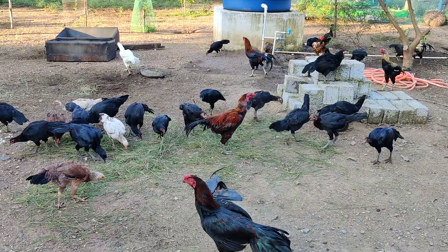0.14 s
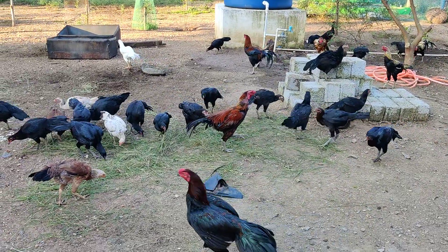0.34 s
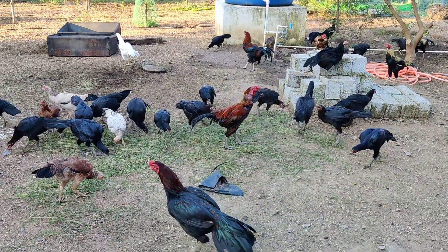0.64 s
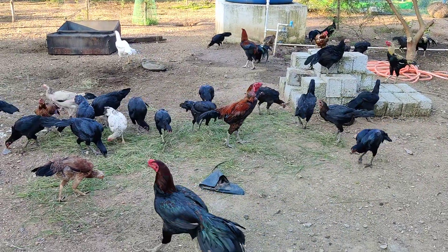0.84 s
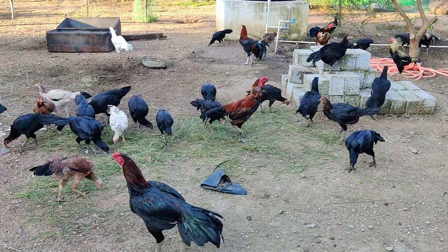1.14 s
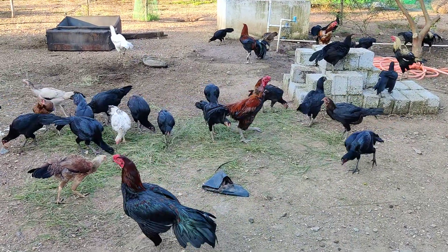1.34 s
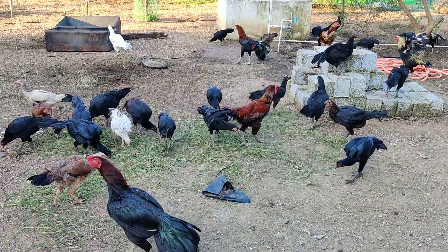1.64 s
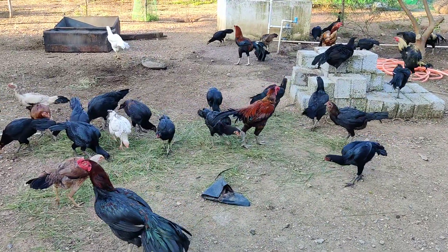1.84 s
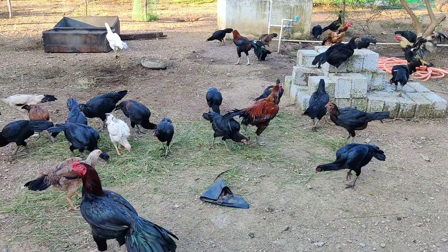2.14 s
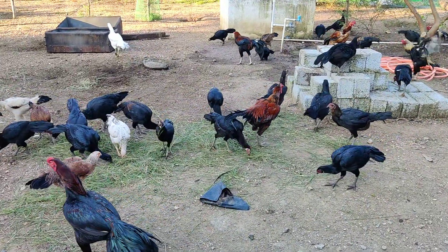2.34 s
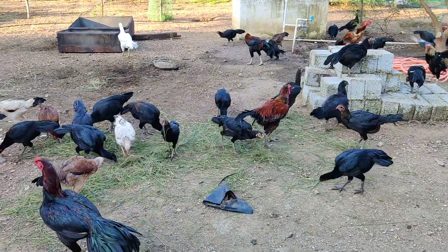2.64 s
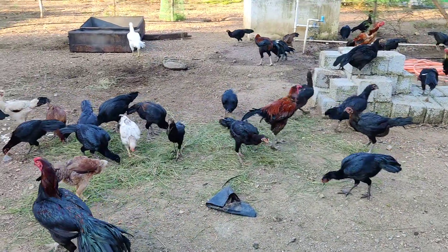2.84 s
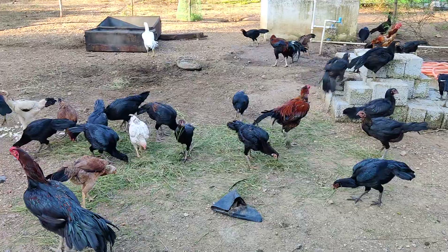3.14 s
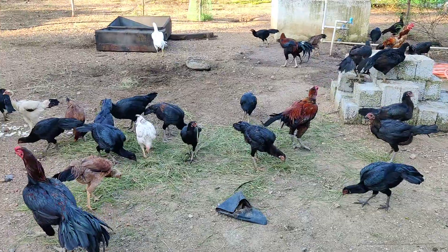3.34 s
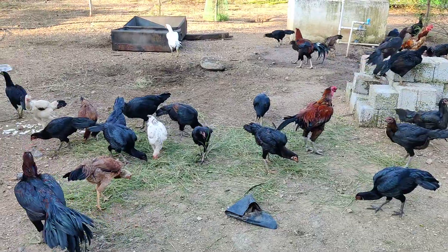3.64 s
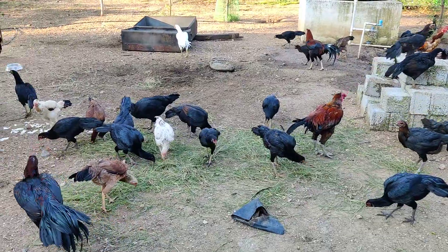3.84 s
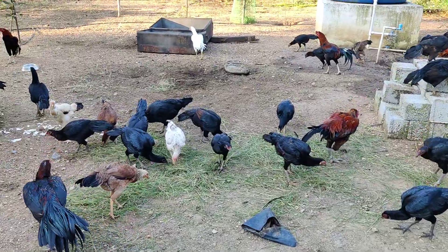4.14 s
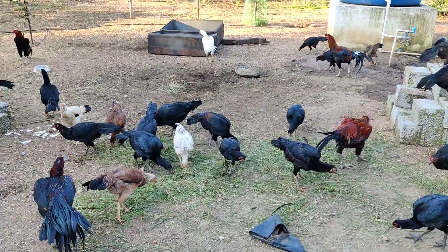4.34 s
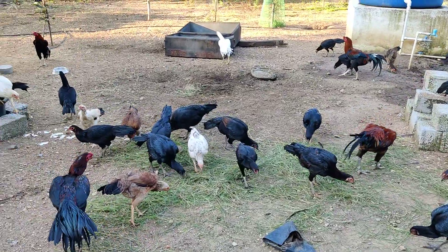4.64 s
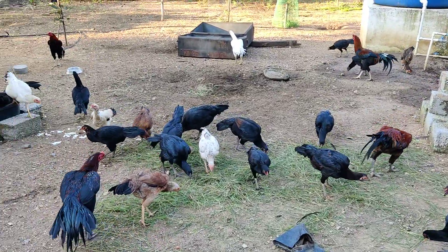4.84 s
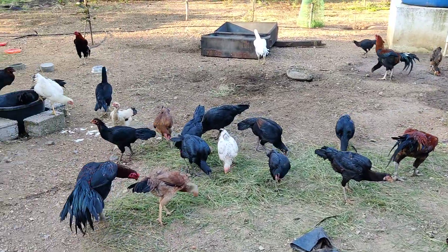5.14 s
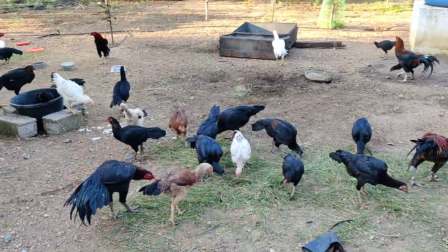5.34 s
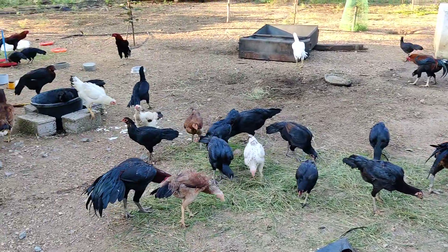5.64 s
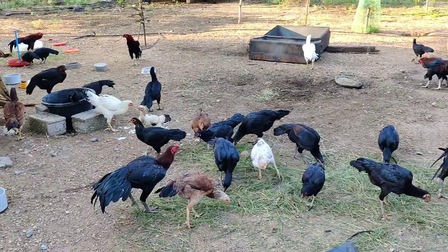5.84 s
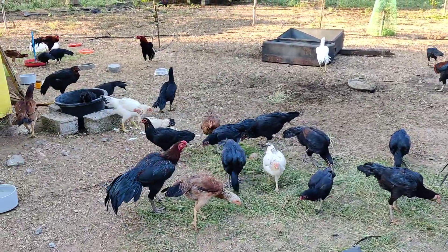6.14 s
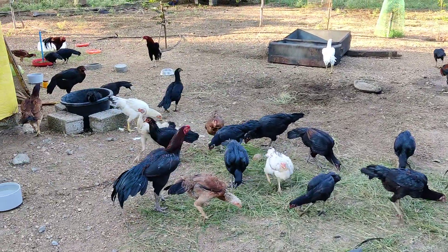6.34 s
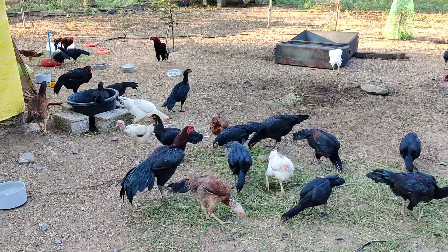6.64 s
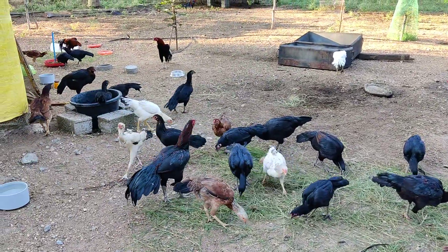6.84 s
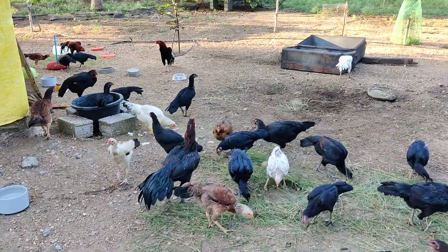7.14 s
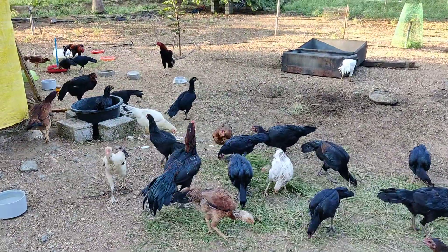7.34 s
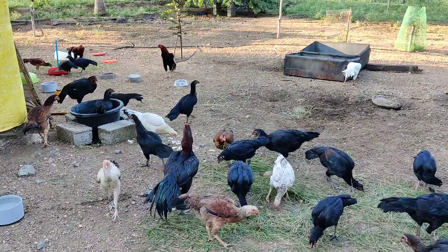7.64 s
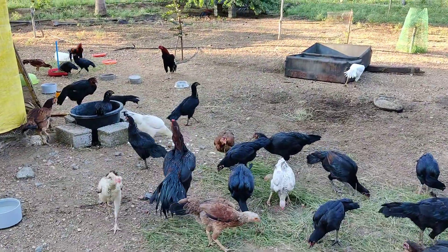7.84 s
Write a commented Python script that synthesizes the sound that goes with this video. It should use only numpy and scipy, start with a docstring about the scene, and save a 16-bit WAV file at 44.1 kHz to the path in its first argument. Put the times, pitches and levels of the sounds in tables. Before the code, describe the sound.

From 0 s a short hoarse, rattling trill sounds slightly left, then hens give soft, low, brief clucks with rising whines and thin chick peeps. Dry beak taps begin around 1.2 s, one quite sharp, with small coos and falling pips. At 2.4 s comes a tiny toneless squawk, followed by wavering whines and denser pecks and gritty clicks until about 4.6 s; clucks near 3.7-4.3 s are lower and fuller. From 4.7 to 6.3 s a rooster on the right crows once, far louder: two short syllables, a longer bright one, then a rasping, shuddering last one that drops abruptly. A light yard echo follows. Until 8 s quiet clucks, pips, high peeps, a few taps and a faint drawn-out whine return. Throughout, soft open-air noise, distant murmuring birds and a faint low engine hum that wavers and strengthens later.

```python
"""Chickens in a farm yard

A flock forages in the open: soft clucks, coos, whines, chick peeps and beaks tapping the ground.
A rooster off to the right crows once in four syllables; his pulsing voice turns from clean to raspy.
Hen notes are harmonics shaped by a throat; trills and whistles are sines; rasps, taps and air use noise.
Walls throw a light echo back, and a far engine hums in multiples of its firing rate."""
import sys
import numpy as np
from scipy import signal
from scipy.fft import rfft, irfft, next_fast_len
from scipy.io import wavfile
from scipy.ndimage import uniform_filter1d, map_coordinates

SR = 44100
rng = np.random.default_rng(int(sys.argv[2]) if len(sys.argv) > 2 else 0)


def generate_wav(sig):
    """Save sig (samples, or channels by samples) to the path in sys.argv[1] as 16-bit PCM at SR."""
    pcm = np.round(np.clip(np.atleast_2d(sig).T, -1, 1) * 32767).astype(np.int16)
    wavfile.write(sys.argv[1], SR, pcm)


N = 353241  # length in samples
TIME = np.arange(N) / SR
FREQS = np.fft.rfftfreq(N, 1 / SR)

# clucks of near and far hens: pitch rise and arch, and throat glide, as shares; roughness 0-1
CLUCK_RISE, CLUCK_ARCH, CLUCK_GAPE, CLUCK_ROUGH = .06, .12, .25, .4
# a full shudder of the rooster: level swing (applied in parts in throat) and pitch bend as a share
SHUDDER_DB, SHUDDER_BEND = 6, 0.05
# tone colour of a hen's harsh hiss: freq_hz, relative_db
HISS_COLOUR = [(120, -31), (200, -16), (480, -14.5), (800, -0.5), (1120, -11), (2400, -8.5), (3050, -24),
               (6040, -30.5), (11700, -86)]


def amp(db):
    """Decibels to gain."""
    return 10 ** (np.asarray(db) / 20)


def unit(x):
    """Scales to rms 1."""
    return x / np.sqrt(np.mean(x ** 2) + 1e-20)


def read(points, hz):
    """Reads a table on a log-frequency axis."""
    f, value = np.transpose(points)
    return np.interp(np.log(hz + 1), np.log(f + 1), value)


def curves(rows):
    """Sample times over a table's span, and its columns at those times."""
    s, *columns = np.transpose(rows)
    t = np.arange(s[0], s[-1], 1 / SR)
    return [t] + [np.interp(t, s, c) for c in columns]


def add(mix, s, sound):
    """Adds a sound into the mix at a time in seconds."""
    start = max(round(s * SR), 0)
    part = mix[..., start:][..., :sound.shape[-1]]
    part += sound[..., :part.shape[-1]]


def colour(x, points, size=2048):
    """Filters with the given spectrum, without any ringing before a sound begins."""
    log_gain = np.log(amp(read(points, abs(np.fft.fftfreq(size, 1 / SR)))))
    # this phase puts the filter's response after time zero
    taps = np.fft.ifft(np.exp(np.conj(signal.hilbert(log_gain)))).real
    return signal.oaconvolve(x, taps[:size // 2])[:len(x)]


def wander(count, hz):
    """Smooth random drift of rms about 1, mostly slower than the given rate."""
    size = next_fast_len(count + 4096)
    f = np.fft.rfftfreq(size, 1 / SR)
    spectrum = rfft(rng.standard_normal(size)) / (1 + (f / hz) ** 4)
    return unit(irfft(spectrum, size))[:count]


def ramp(x):
    """Eases from 0 to 1 as x goes from 0 to 1."""
    return np.sin(np.pi / 2 * np.clip(x, 0, 1)) ** 2


def ports(x, balance, phase=0):
    """Sets the level and phase difference between the two microphones, by frequency."""
    half = amp(read(balance, FREQS) / 2) * np.exp(.5j * phase)
    pair = np.array([half, 1 / half])
    level = np.sqrt(np.mean(abs(pair) ** 2, 0))  # keeps the mean power of the pair
    return irfft(rfft(x) * pair / level, N)


def place(x, side, across_s=0.00033, shade_db=1):
    """A sound from one side (-1 left, 1 right) reaches the far microphone later and a little weaker."""
    lag = int(round(min(abs(side), 1) * across_s * SR))
    near = np.pad(x, (0, lag))
    far = np.pad(x, (lag, 0)) * amp(-shade_db * abs(side))
    return np.array([far, near] if side > 0 else [near, far])


def air(air_db=-50, rustle_db=2.0):
    """The noise of the open yard, swelling slightly as feet shuffle in the straw."""
    # spectrum of the air: freq_hz, relative_db (per Hz)
    spectrum = [(25, 0.5), (100, -4), (200, -8.5), (480, -20.5), (850, -16), (1300, -24), (2400, -17.5),
                (3300, -28), (6400, -31.5), (8000, -39.5), (9500, -54), (13000, -51)]
    # how alike the two channels are: freq_hz, likeness (-1 to 1)
    likeness = [(60, 0.76), (180, 0.99), (520, 0.63), (1520, -0.27), (4470, 0.13), (13100, -0.21)]
    a, b = rfft(rng.standard_normal((2, N)))
    same = np.clip(read(likeness, FREQS), -.99, .99)
    right = same * a + np.sqrt(1 - same ** 2) * b
    pair = irfft(np.array([a, right]) * amp(read(spectrum, FREQS)), N)
    return amp(air_db + rustle_db * wander(N, 18)) * unit(pair)


def engine(waver=0.011, flutter=0.092, clatter_db=-22, clatter_share=0.13):
    """A far engine: its lowest orders carry, with a faint rattle at each firing."""
    # speed and loudness: time_s, firings_per_s, level_db
    running = [(0.1, 45.4, -50), (1.5, 43.7, -57.5), (2.25, 43.6, -55), (2.62, 42.5, -43.5),
               (3.31, 42, -49.5), (3.94, 43.2, -45.5), (4.811, 43, -50.5), (5.07, 41.2, -44),
               (7.2, 40.9, -42.5), (7.5, 43.5, -49.5)]
    # multiples 1, 2, 3, 4 of the firing rate: relative_db
    orders = [-1.5, -2, -13.5, -15.5]
    # tone colour of the rattle: freq_hz, relative_db
    clatter = [(600, -27), (1400, 4), (2050, 9), (3000, -6.5), (8000, -28)]
    s, hz, db = np.transpose(running)
    turns = np.cumsum(np.interp(TIME, s, hz) * (1 + waver * wander(N, 6))) / SR
    hum = 0
    for k, level in enumerate(orders, 1):
        hum = hum + amp(level) * np.cos(2 * np.pi * k * turns) * (1 + flutter * wander(N, 3.4))
    bursts = np.exp(-(turns % 1) / clatter_share)  # dies away after each firing
    rattle = colour(rng.standard_normal(N) * bursts, clatter)
    return amp(np.interp(TIME, s, db)) * (unit(hum) + amp(clatter_db) * unit(rattle))


def trill(rolls_hz=52, first_roll_s=.07, swing=0.23, rasp=0.31):
    """A rattling call: each roll is a short, hoarse, falling pip."""
    # the whole call: time_s, level_db, middle_pitch_hz
    call = [(0, -43.5, 1380), (.06, -42, 1308), (.068, -31, 910), (.089, -32, 884), (.105, -37.5, 849),
            (.15, -39.5, 855), (.19, -51, 850)]
    t, db, hz = curves(call)
    roll = ((t - first_roll_s) * rolls_hz + .5) % 1  # 0 to 1 within each roll
    pitch = hz * (1 + swing * (1 - 2 * roll) + 0.114 * wander(len(t), 280))
    turns = np.cumsum(pitch) / SR
    hiss = unit(colour(rng.standard_normal(len(t)), HISS_COLOUR))
    voice = unit(np.sin(2 * np.pi * turns)) * np.sin(np.pi * roll) ** 2 + rasp * hiss
    out = np.zeros((2, N))
    add(out, t[0], place(amp(db) * voice, -0.29))
    return out


def hen_note(length, first_hz, last_hz, throat_hz, db, rough, arch=0.026, gape=0, bright_db=0,
             width_hz=330, jitter=0.1806, rasp=0.9):
    """One arched glide of a hen's syrinx through her throat resonance, which rises and falls as the beak gapes."""
    # gain besides the main resonance: freq_hz, gain_db (before bright_db is added)
    hen_throat = [(220, -1), (400, -10), (1000, -26), (1700, -43), (2450, -19.5), (2900, -29.5),
                  (3400, -26.5), (3850, -31.5), (4350, -28), (5200, -50), (8000, -49.5)]
    u = np.linspace(0, 1, max(int(length * SR), 200))
    bow = np.sin(np.pi * u) - 2 / np.pi  # an arch that averages zero
    hz = (first_hz + (last_hz - first_hz) * u) * (1 + arch * bow)
    turns = np.cumsum(hz * (1 + jitter * rough * wander(len(u), 223))) / SR
    k = np.arange(1, int(8000 / first_hz) + 1)[:, None]  # harmonic numbers
    detune = 2 * (k * hz - throat_hz * (1 + gape * bow)) / width_hz
    gains = 1 / (1 + detune ** 2) + amp(read(hen_throat, k * hz) + bright_db)
    # each pulse rings out causally, so higher harmonics lag behind
    harmonics = gains * np.cos(2 * np.pi * k * turns - np.arctan(detune))
    tone = unit(harmonics.sum(0))
    swell = np.sin(np.pi * u ** 0.8).clip(0) ** 0.52
    return amp(db) * swell * tone * (1 + rasp * rough * wander(len(u), 120))


def far_flock(count=150, murmur_db=-55.5, spread_db=11, hush_db=7):
    """Birds further off cluck briefly at random, mostly low, and grow quieter as time goes on."""
    out = np.zeros((2, N))
    for k, (slip, length, pitch, glide, throat_draw, loud, side) in enumerate(rng.random((count, 7))):
        when = ((k + slip) / count) ** 1.35  # share of the scene; clucks thin out only slowly
        hz = 200 * 5 ** (pitch ** 2)
        last_hz = hz * (1.1 - .3 * glide)
        db = murmur_db + spread_db * (loud - .5) + hush_db * (.5 - when)
        note = hen_note(.02 + .045 * length, hz, last_hz, 560 + 460 * throat_draw, db, CLUCK_ROUGH,
                        arch=CLUCK_ARCH, gape=CLUCK_GAPE)
        add(out, when * N / SR, place(note, 2 * side - 1))
    return out


def peep(length, hz, db, fall=0.14):
    """A thin, quavering whistle that loses a share (fall) of its pitch."""
    u = np.linspace(0, 1, int(length * SR))
    quaver = .035 * wander(len(u), 300)
    turns = np.cumsum(hz * (1 - fall * u ** 2 + quaver)) / SR
    return amp(db) * np.sin(np.pi * u) * np.sin(2 * np.pi * turns)


def chicks(count=80, peep_db=-62, spread_db=7, low_hz=2500, high_hz=4800):
    """A few near peeps among many faint ones, each a falling whistle."""
    # the nearer peeps: start_s, length_s, first_pitch_hz, level_db
    near_peeps = [(.325, 0.03, 2420, -55), (.53, 0.027, 2480, -57), (.728, .04, 2530, -53),
                  (.91, 0.023, 2650, -59), (1.375, 0.053, 2780, -50), (2.33, 0.031, 2520, -52),
                  (6.7, .05, 3730, -59.5), (6.905, 0.056, 3240, -57), (7.45, 0.047, 3550, -49),
                  (7.56, .04, 3250, -52)]
    out = np.zeros((2, N))
    faint = []
    for when, length, pitch, loud in rng.random((count, 4)):
        hz = low_hz + (high_hz - low_hz) * pitch ** 2
        db = peep_db + spread_db * (loud - pitch)  # higher peeps are fainter
        faint.append((when * N / SR, 0.029 + 0.042 * length, hz, db))
    for s, length, hz, db in list(near_peeps) + faint:
        add(out, s, place(peep(length, hz, db), rng.uniform(-1, 1)))
    return out


def pecks(count=90, small_db=-56, spread_db=9, ring=0.7, ring_hz=2458, knock_t60_s=.026, grit_t60_s=.01):
    """Beaks strike the ground: a dry, briefly ringing knock and a click of grit; many are small."""
    # the louder pecks: start_s, peak_db, grit_share (0-1)
    loud_pecks = [(1.1626, -27.5, 0.06), (1.2375, -38, .1), (1.5837, -43, 0.07), (1.6031, -39.5, .1),
                  (2.112, -42, .1), (2.2407, -41, .1), (2.604, -32.5, 0.4), (2.6522, -29, 0.07),
                  (2.7503, -34, 0.36), (3.262, -35, 0.75), (3.2871, -37.5, 0.2), (3.3389, -42, 0.23),
                  (3.3948, -33, 0), (3.7335, -34.5, 0.7), (3.9401, -40, 0), (4.181, -39, 0.15),
                  (4.2154, -37, 0.2), (4.596, -36, 1), (6.8673, -41.5, 0.63), (7.3143, -36, 0.15),
                  (7.3502, -40, 0.25)]
    # tone colour of the knock: freq_hz, relative_db
    knock_colour = [(300, 19), (1100, 16.5), (1700, 11), (2500, 22.5), (3600, 3), (6500, -5.5), (8000, -30),
                    (12000, -23.5)]
    # tone colour of the grit: freq_hz, relative_db
    grit_colour = [(1000, -13), (3000, -2), (5500, 9), (7500, -3), (9000, -21), (12000, -33)]
    t = np.arange(2000) / SR
    out = np.zeros((2, N))
    small = [(when * N / SR, small_db + spread_db * loud ** 2, .5 * grit)
             for when, loud, grit in rng.random((count, 3))]
    for s, db, grit in list(loud_pecks) + small:
        hz = ring_hz * (1 + 0.11 * rng.uniform(-1, 1))
        thud = unit(colour(rng.standard_normal(len(t)), knock_colour))
        knock = (thud + ring * np.sin(2 * np.pi * hz * t)) * amp(-60 * t / knock_t60_s)
        click = unit(colour(rng.standard_normal(len(t)), grit_colour)) * amp(-60 * t / grit_t60_s)
        tick = (1 - grit) * knock + grit * click
        add(out, s, place(amp(db) * tick / abs(tick).max(), rng.uniform(-0.3, 0.18)))
    return out


def yard(x, first_s=0.0035, early_db=7, early_s=0.031):
    """Sparse echoes: strong ones from near walls, then a thin tail that dies band by band."""
    # time for the echoes to fall by 60 dB: freq_hz, t60_s
    decay = [(200, 0.084), (700, 0.52), (2400, 0.57), (5000, 0.57), (10000, 0.18)]
    taps = rng.standard_normal((2, SR)) * (rng.random((2, SR)) < 2500 / SR)  # about 2500 a second
    t = np.arange(SR) / SR
    taps = taps * (t > first_s) * (1 + amp(early_db) * np.exp(-t / early_s))
    hz, t, bands = signal.stft(taps, SR, nperseg=256)
    fading = bands * amp(-60 * t / read(decay, hz)[:, None])
    tail = signal.istft(fading, SR, nperseg=256)[1]
    tail = tail / np.linalg.norm(tail, axis=1, keepdims=True)
    return signal.fftconvolve(np.atleast_2d(x), tail, axes=1)[:, :N]


def hens(clucks_db=5.5, coos_db=8.0, pips_db=8.5, whines_db=3.5):
    """The near birds sing through the throat; in all but the clucks it is tuned to the pitch."""
    # the level_db of each kind is raised by that kind's setting above
    # a few low beats through an open beak: start_s, length_s, pitch_hz, throat_hz, level_db
    cluck_notes = [(0.216, 0.023, 311, 750, -56), (0.278, 0.028, 309, 830, -53.5),
                   (0.421, 0.05, 295, 740, -49), (0.749, 0.041, 324, 770, -48),
                   (0.894, 0.032, 311, 700, -61.5), (0.952, 0.03, 337, 760, -48.5),
                   (1.046, 0.031, 338, 780, -59), (1.115, 0.039, 385.5, 795, -48.5),
                   (1.25, 0.02, 449, 860, -46.5), (1.441, 0.046, 304, 900, -49.5),
                   (1.678, 0.013, 464, 920, -45.5), (1.802, 0.11, 305, 990, -52.5),
                   (1.908, 0.038, 287, 870, -57.5), (2.058, 0.087, 328, 970, -58.5),
                   (2.265, 0.044, 309.6, 900, -49.5), (2.71, 0.016, 349, 700, -49),
                   (2.885, 0.039, 337, 730, -53), (3.04, 0.018, 422, 856, -53.5),
                   (3.122, .016, 395, 790, -51), (3.152, 0.019, 315, 920, -51.5),
                   (3.244, 0.013, 416, 880, -49), (3.561, 0.12, 294, 960, -55.5),
                   (3.678, 0.026, 221, 860, -45), (3.831, 0.036, 279.5, 760, -41.5),
                   (3.889, 0.049, 267.4, 850, -51), (3.968, 0.05, 252.6, 790, -45),
                   (4.124, 0.048, 233.2, 754, -47.5), (4.294, 0.041, 211.5, 820, -42.5),
                   (6.485, 0.016, 388, 955, -49), (6.681, 0.011, 422, 740, -42.5),
                   (7.085, 0.013, 386, 780, -41), (7.13, 0.026, 342, 790, -51.5)]
    # low and nearly pure through a closed beak: start_s, pitch_hz, level_db
    coo_notes = [(1.259, 462, -49.5), (1.475, 428, -50), (1.485, 242, -49.5), (1.629, 422, -50),
                 (1.792, 434, -53), (3.005, 252, -53), (4.155, 341, -47.5), (4.33, 352, -47.5)]
    # short and falling: start_s, first_pitch_hz, level_db
    pip_notes = [(.58, 990, -53.5), (1.125, 792, -51.5), (1.345, 1090, -53.5), (1.381, 1310, -46.5),
                 (3.345, 933, -56.5), (4.481, 902, -49), (4.547, 1020, -52.5), (4.61, 1125, -60.5),
                 (7.25, 1040, -53), (7.285, 1092, -45), (7.49, 1040, -50), (7.52, 1015, -50.5),
                 (7.771, 1045, -52)]
    # thin and drawn out: start_s, length_s, first_pitch_hz, last_pitch_hz, level_db, roughness (0-1)
    whine_notes = [(0.449, 0.16, 700, 900, -52, 0.26), (.62, 0.14, 820, 920, -53.5, 0.2),
                   (0.986, 0.053, 910, 877, -55.5, .1), (1.235, 0.099, 1700, 1330, -58, 0.04),
                   (2.476, 0.17, 1008, 1080, -54, 0.69), (2.63, 0.24, 1450, 1576, -52.5, 0.14),
                   (2.83, 0.12, 1296, 830, -53, 0.21), (4.331, 0.47, 581, 522, -58, 0.16),
                   (6.98, 0.06, 908, 729, -55, 0.07), (7.481, 0.13, 727, 558, -53.5, 0.14),
                   (7.594, 0.5, 561, 569, -59, 0.05)]
    # where the birds are: time_s, side (-1 left to 1 right)
    flock_side = [(1, -0.42), (1.8, -0.45), (2.25, 0.34), (2.55, -0.53), (3.85, -0.57), (4.15, 0.053),
                  (6.5, .9), (7.53, 0.77), (7.6, -.7)]
    coo_s, coo_rough, coo_arch = 0.0322, 0.35, 0.13
    pip_s, pip_fall, pip_rough = 0.0368, 0.22, 0.35
    notes = []
    for s, length, hz, throat_hz, db in cluck_notes:
        note = hen_note(length, hz * (1 - CLUCK_RISE), hz * (1 + CLUCK_RISE), throat_hz, db + clucks_db,
                        CLUCK_ROUGH, arch=CLUCK_ARCH, gape=CLUCK_GAPE)
        notes.append((s, note))
    for s, hz, db in coo_notes:
        notes.append((s, hen_note(coo_s, hz, hz, hz, db + coos_db, coo_rough, arch=coo_arch)))
    for s, hz, db in pip_notes:
        last_hz, middle_hz = hz * (1 - pip_fall), hz * (1 - pip_fall / 2)
        notes.append((s, hen_note(pip_s, hz, last_hz, middle_hz, db + pips_db, pip_rough)))
    for s, length, first_hz, last_hz, db, rough in whine_notes:
        middle_hz = (first_hz + last_hz) / 2
        note = hen_note(length, first_hz, last_hz, middle_hz, db + whines_db, rough, bright_db=6.5)
        notes.append((s, note))
    out = np.zeros((2, N))
    for s, note in notes:
        side = np.interp(s, *np.transpose(flock_side)) + rng.uniform(-0.23, 0.22)
        add(out, s, place(note, side))
    return out


def squawk():
    """One toneless burst of coloured noise from a startled bird."""
    # loudness of the burst: time_s, level_db
    burst = [(2.36, -65), (2.371, -29.5), (2.385, -35), (2.394, -46), (2.42, -77)]
    t, db = curves(burst)
    hiss = unit(colour(rng.standard_normal(len(t)), HISS_COLOUR))
    out = np.zeros((2, N))
    add(out, t[0], place(amp(db) * hiss, 0.4))
    return out


def stretched(x, points, stretch):
    """A filter whose resonances all slide by the factor stretch."""
    # bend time, filter, then bend time back
    clock = np.cumsum(stretch) - stretch[0]
    ticks = np.arange(int(clock[-1]) + 1)
    even = map_coordinates(x, [np.interp(ticks, clock, np.arange(len(x)))])
    return map_coordinates(colour(even, points), [clock], mode="nearest")


def steady(x, size=1200):
    """Holds the level near rms 1 and keeps the fine grain."""
    return x / np.sqrt(abs(uniform_filter1d(x ** 2, size=size)) + 1e-12)


def syrinx(hz, rough, tremor=0.0025):
    """Beats regularly or breaks into chaos: the low harmonics stay as lines, the high ones turn to rasp."""
    n = len(hz)
    turns = np.cumsum(hz * (1 + (tremor + .035 * rough) * wander(n, 150))) / SR
    turns = turns + .065 * rough * wander(n, 300)
    beats = unit(sum(np.cos(2 * np.pi * k * turns) / np.sqrt(k) for k in np.arange(1, 19)))
    puffs = unit((1 + np.cos(2 * np.pi * turns)) * rng.standard_normal(n))
    return beats * (1 + .25 * rough * wander(n, 200)) + .45 * rough * puffs


def throat(drive, t, levels, shudder, overtones, rest_hz=2397):
    """Resonances swell and slide as the beak opens; the high one can break into a wavering whistle of its own."""
    # low resonance, which stays put: freq_hz, relative_db
    low_shape = [(200, -54), (400, -14), (520, -2), (640, 7.5), (735, -4.5), (830, -21.5), (1100, -56.5),
                 (9000, -85)]
    # middle resonance with the beak at rest_hz: freq_hz, relative_db
    middle_shape = [(650, -40), (870, -7), (1010, 1.5), (1280, -9), (1440, -3.5), (1530, -6), (1680, -3.5),
                    (1850, -19.5), (2800, -90)]
    # high resonance with the beak at rest_hz: freq_hz, relative_db
    high_shape = [(1450, -56.5), (1950, -19), (2190, -14.5), (2380, 2.5), (2480, 0), (2660, -10),
                  (3450, -24.5), (3850, -43), (12000, -76.5)]
    # the beak's opening: time_s, resonance_hz, whistle_share (of power, 0-1)
    beak = [(4.73, 2307, 0), (4.84, 2395, 0.48), (4.9, 2288, 0.52), (5.2, 2298, 0.04), (5.48, 2447, 0.024),
            (5.81, 2298, 0.16), (5.92, 2251, 0.62), (6.05, 2331, .6), (6.2, 2270, 0.4), (6.25, 2265, 0)]
    s, hz, share = np.transpose(beak)
    beak_hz = np.interp(t, s, hz)
    share = np.clip(np.interp(t, s, share), 0, 1)
    turns = np.cumsum(beak_hz * (1 + .026 * wander(len(t), 220))) / SR
    whistle = unit(np.sin(2 * np.pi * turns) * (1 + .3 * wander(len(t), 120)))
    low = steady(colour(drive, low_shape)) * amp(SHUDDER_DB * shudder)
    middle = steady(stretched(drive, middle_shape, beak_hz / rest_hz))
    high = steady(stretched(drive, high_shape, beak_hz / rest_hz))
    high = np.sqrt(1 - share) * high + np.sqrt(share) * whistle
    rings = low, middle, high, steady(colour(drive, overtones))
    voice = sum(amp(db) * ring for db, ring in zip(levels, rings))
    return voice * amp(SHUDDER_DB * shudder / 2)  # the whole voice shudders at half depth


def rooster(edge_s=0.0099):
    """One crow: the syrinx drives the throat syllable by syllable; the throat narrows for the last."""
    # four syllables, each with rows of: time_s, pitch_hz, roughness (0-1),
    # low_db, middle_db, high_db, overtones_db (levels of the throat's resonances)
    syllables = [
        [(4.728, 529.5, 0.89, -31, -30.5, -43, -55), (4.76, 545.7, .08, -28, -30.5, -36.5, -47.5),
         (4.8, 609.4, 0.037, -21.5, -31.5, -29.5, -43), (4.815, 663, 0.66, -19, -34.5, -27, -40),
         (4.85, 650.3, 0.73, -22.5, -33, -24, -50.5), (4.875, 567.4, 0.23, -25.5, -31.5, -26.5, -44),
         (4.905, 515, 0.33, -39, -36.5, -41, -53), (4.935, 460, 0.46, -56.5, -37, -44.5, -64)],
        [(5.018, 526, 0.88, -32, -30, -34, -46.5), (5.035, 577, 0.75, -31, -30, -33.5, -45),
         (5.045, 709, 0.15, -18, -34.5, -25, -40.5), (5.062, 738, 0.038, -23.5, -16.5, -45, -38.5),
         (5.085, 728.6, 0.19, -20.5, -34, -41, -41.5), (5.103, 682, 0.28, -19.5, -40, -35, -54),
         (5.14, 540, 0.4, -44, -55, -54, -52)],
        [(5.16, 519.5, 0.68, -30.5, -31.5, -56, -53), (5.185, 594, 0.42, -30.5, -29, -32, -47),
         (5.2, 689, 0.091, -16.5, -41, -33, -43), (5.22, 718, 0.026, -22.5, -23, -44.5, -46),
         (5.27, 716.5, 0.039, -19.5, -29, -39, -40.5), (5.31, 727.6, 0.03, -23, -19.5, -40.5, -40.5),
         (5.385, 740, 0.05, -24.5, -22, -35, -38), (5.422, 743, 0.37, -32, -27, -36.5, -44),
         (5.45, 719.5, 0.34, -20.5, -24, -33.5, -41), (5.53, 713.3, 0.57, -25, -24.5, -36, -42),
         (5.575, 594.7, 0.76, -26.5, -32.5, -33.5, -49), (5.62, 557, .9, -47.5, -37.5, -39.5, -52),
         (5.7, 484, 0.7, -58, -39, -60, -69)],
        [(5.735, 705, 0.94, -55, -44, -50.5, -67), (5.785, 699.9, 0.92, -41.5, -38, -34, -51),
         (5.812, 687.4, 0.13, -53, -28, -36, -53), (5.836, 674, 0.52, -27.5, -25, -32.5, -45.5),
         (5.92, 666.6, 0.894, -23.5, -31.5, -25.5, -44.5), (6.05, 679.4, 0.74, -25.5, -31, -27.5, -44.5),
         (6.19, 690.3, 0.45, -21, -28.5, -29, -45.5), (6.235, 661.2, .15, -16.5, -30.5, -34, -48),
         (6.276, 644.3, 0.072, -20.5, -36.5, -38, -48), (6.288, 565.4, .5, -24.5, -36, -30, -42.5),
         (6.312, 426, 0.54, -32, -35, -54.5, -58)],
    ]
    # one row a syllable: shudder_rate_hz, depth (0-1)
    shudders = [(59, .75), (45, .3), (27, 1), (40, .2)]
    # upper resonances of the wide throat: freq_hz, relative_db
    wide_overtones = [(2400, -35.5), (2950, 0), (3300, -4.5), (3800, -10), (4300, -4.5), (4700, -17),
                      (5100, 6.5), (5480, -4.5), (5850, 2), (6500, -4.5), (7100, -17), (7900, -13.5),
                      (12600, -33.5)]
    # upper resonances of the narrowed throat: freq_hz, relative_db
    narrow_overtones = [(2400, -37.5), (3150, 6), (3850, -17), (4200, -1.5), (4480, -15), (5000, 7.5),
                        (5420, -8.5), (5750, -1), (6250, -18), (6620, 2), (7250, -16), (7900, -8),
                        (8800, -23), (12600, -32)]
    out = np.zeros(N)
    for k, (syllable, (rate_hz, depth)) in enumerate(zip(syllables, shudders)):
        t, hz, rough, *levels = curves(syllable)
        rough = np.clip(rough, 0, 1)
        shakes = np.cumsum(rate_hz * (1 + .1 * wander(len(t), 25))) / SR
        shudder = depth * rough * np.cos(2 * np.pi * shakes)
        drive = syrinx(hz * (1 + SHUDDER_BEND * shudder), rough * (1 - shudder))
        overtones = narrow_overtones if k == len(syllables) - 1 else wide_overtones
        voice = throat(drive, t, levels, shudder, overtones)
        fade = ramp((t - t[0]) / edge_s)
        add(out, t[0], voice * fade * fade[::-1])
    return out


def scene(crow_echo_db=-12, flock_echo_db=-11, wall_s=.068, wall_db=-23.5):
    """The crow from the right, the flock in front, and the yard around them."""
    # the crow at the two microphones: freq_hz, left_minus_right_db
    crow_balance = [(400, -0.5), (720, 0.5), (1400, -4.5), (2600, -11), (2950, -8), (3400, 3.5),
                    (5000, -2.5), (8000, 3.5)]
    # the crow at the two microphones: freq_hz, left_lead_radians
    crow_phase = [(20, -7), (300, 0), (700, -1.34), (1400, -2), (2300, -4), (3000, -1.5), (5000, -4.5),
                  (6600, -4.5), (12000, -13)]
    # everything else at the two microphones: freq_hz, left_minus_right_db
    mic_balance = [(1000, 0.5), (2100, -3), (2700, -8.5), (3800, -2), (6000, -3.5), (8000, 1)]
    # boost of the crow as it spreads into the yard's echoes: freq_hz, gain_db
    beak_spread = [(720, 1.47), (2400, 5.5), (5000, 8.7)]
    crow = rooster()
    flock = hens() + trill() + squawk() + far_flock() + chicks() + pecks()
    into_yard = amp(flock_echo_db) * flock + amp(crow_echo_db) * colour(crow, beak_spread)
    around = flock + yard(into_yard) + air() + engine()
    add(around, wall_s, amp(wall_db) * crow)  # one far wall returns the crow
    direct = ports(crow, crow_balance, read(crow_phase, FREQS))
    return direct + ports(around, mic_balance)


def record(dry, edge_hz=12800):
    """A low-pass filter takes away the treble above edge_hz."""
    taps = signal.firwin(511, edge_hz, window=("kaiser", 9), fs=SR)
    return signal.oaconvolve(dry, taps[None], "same")


dry = scene()
out = record(dry)
generate_wav(out)
```